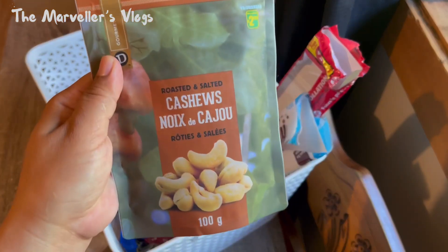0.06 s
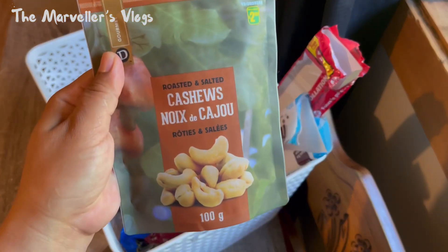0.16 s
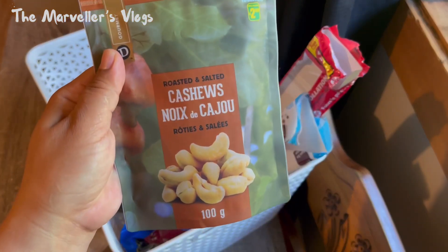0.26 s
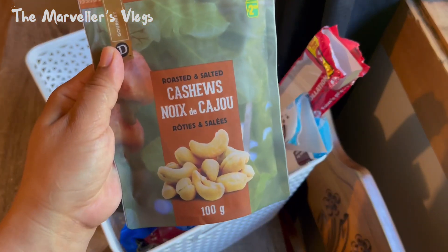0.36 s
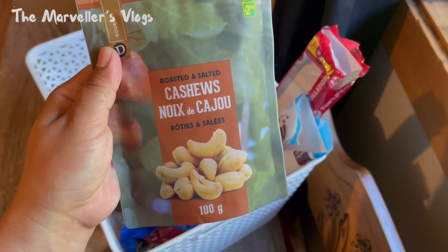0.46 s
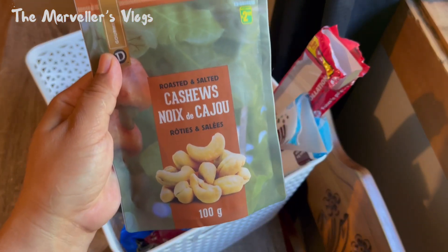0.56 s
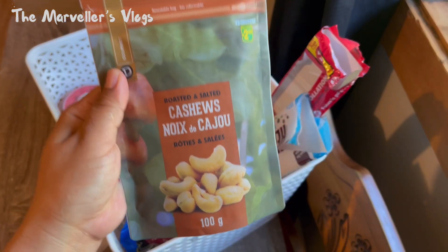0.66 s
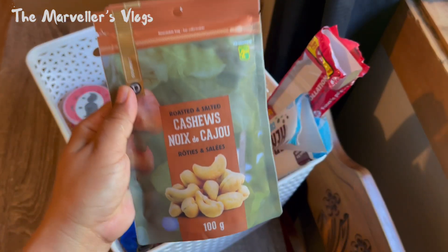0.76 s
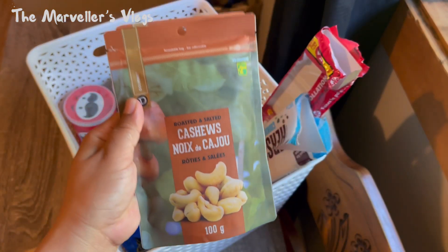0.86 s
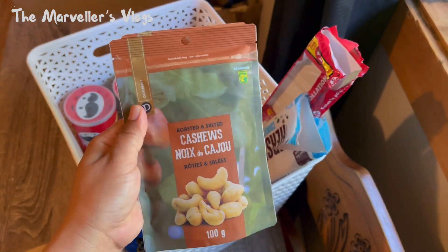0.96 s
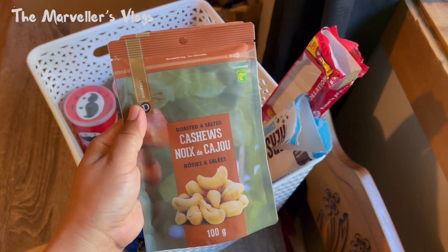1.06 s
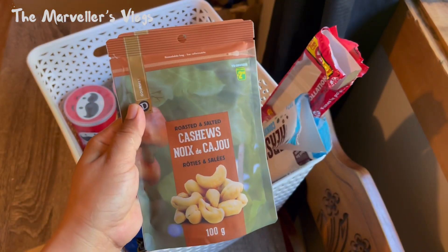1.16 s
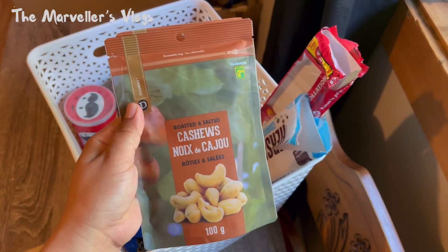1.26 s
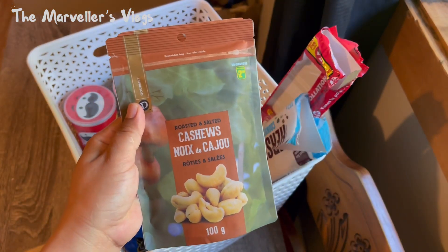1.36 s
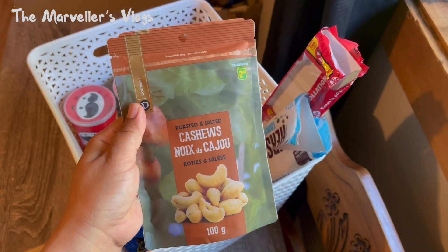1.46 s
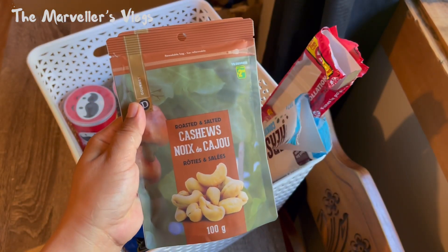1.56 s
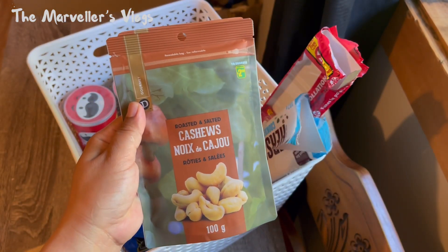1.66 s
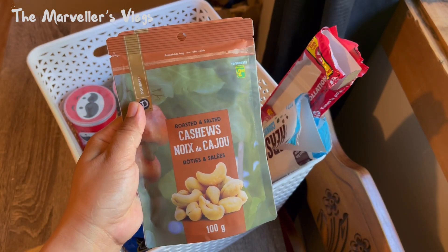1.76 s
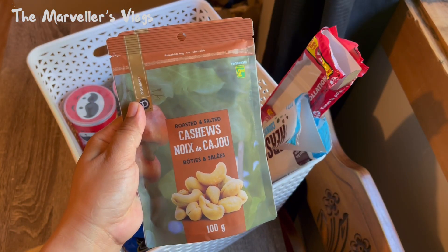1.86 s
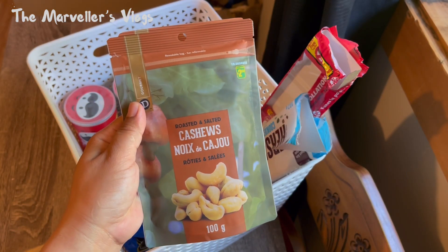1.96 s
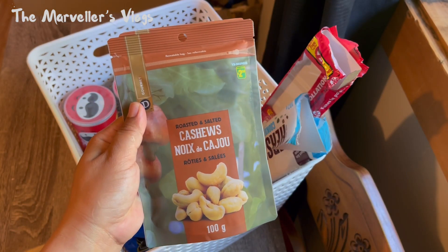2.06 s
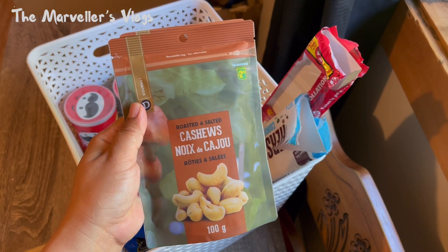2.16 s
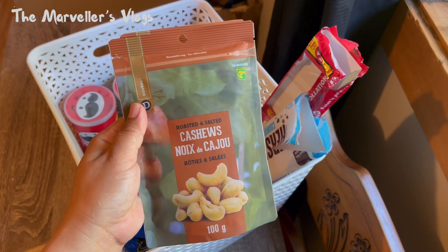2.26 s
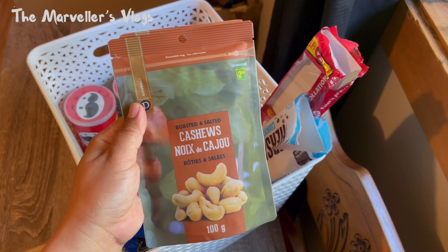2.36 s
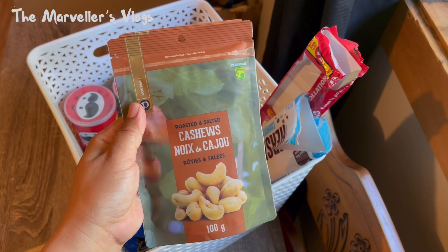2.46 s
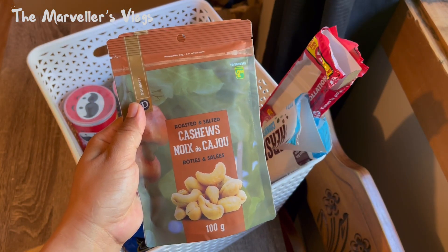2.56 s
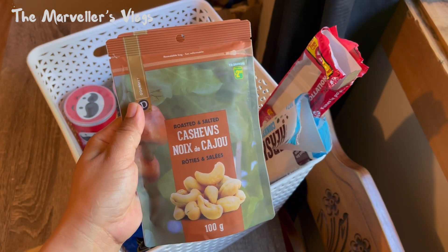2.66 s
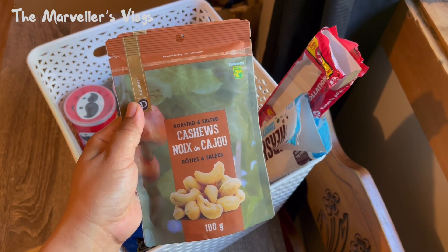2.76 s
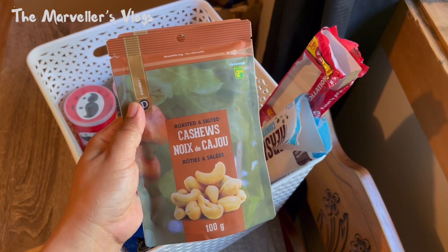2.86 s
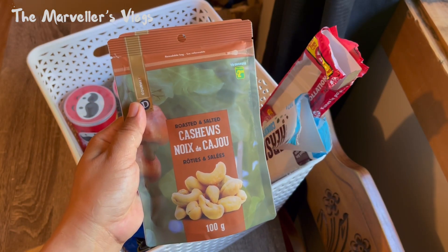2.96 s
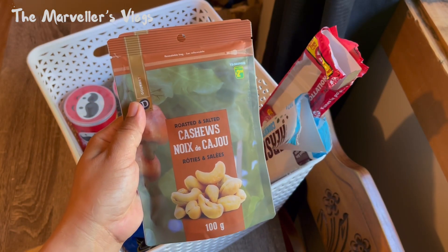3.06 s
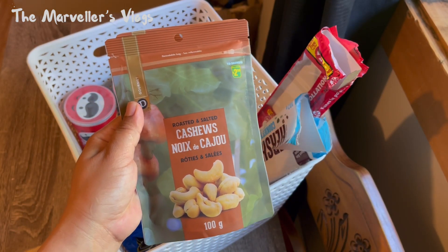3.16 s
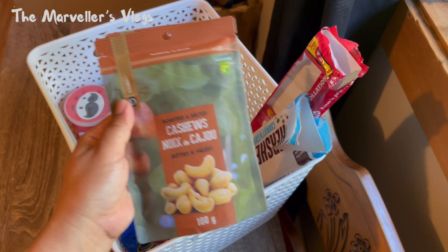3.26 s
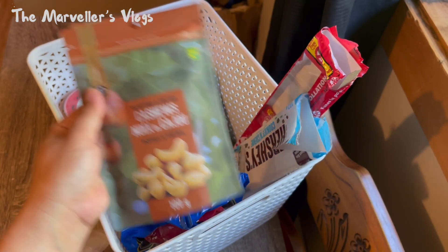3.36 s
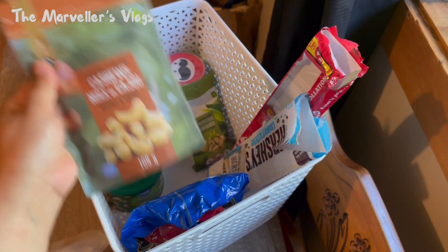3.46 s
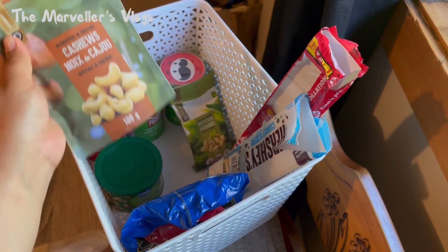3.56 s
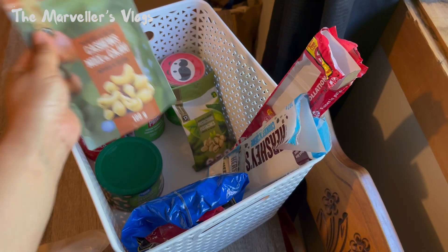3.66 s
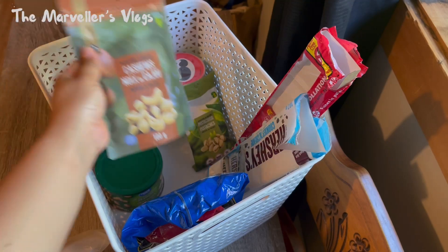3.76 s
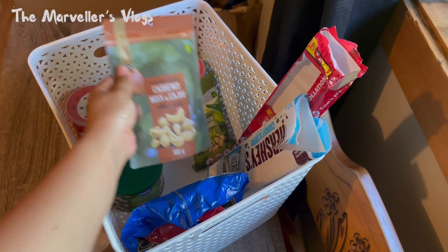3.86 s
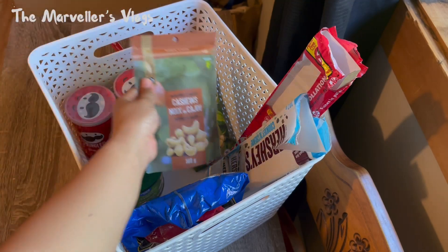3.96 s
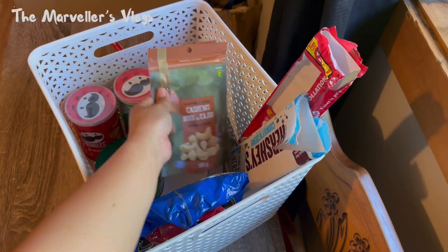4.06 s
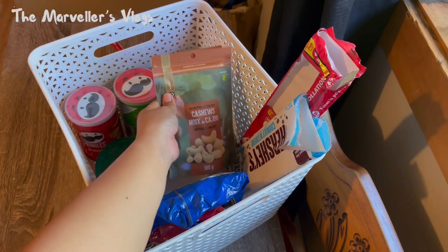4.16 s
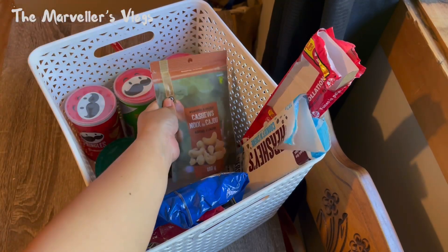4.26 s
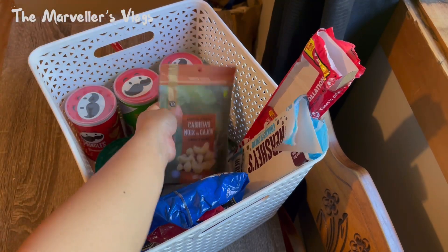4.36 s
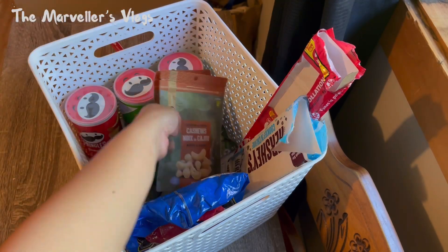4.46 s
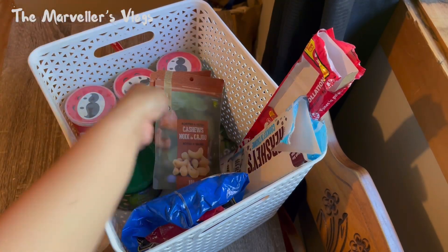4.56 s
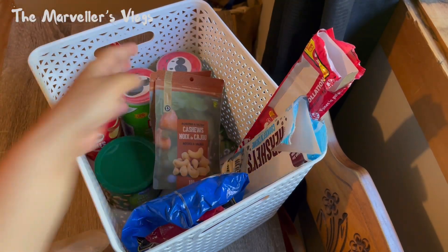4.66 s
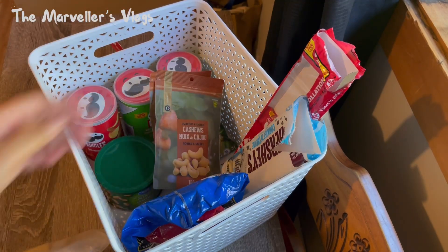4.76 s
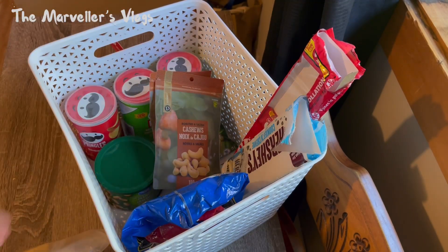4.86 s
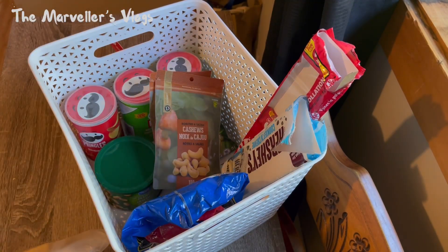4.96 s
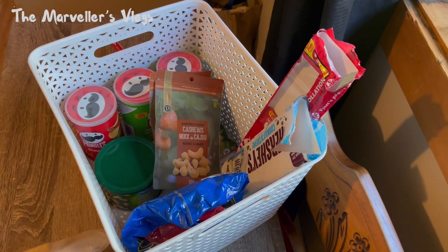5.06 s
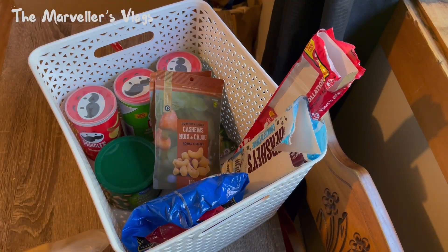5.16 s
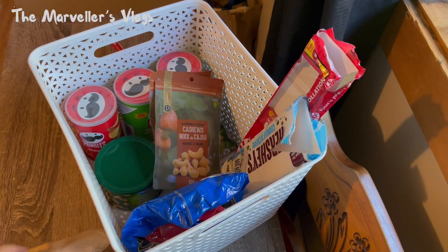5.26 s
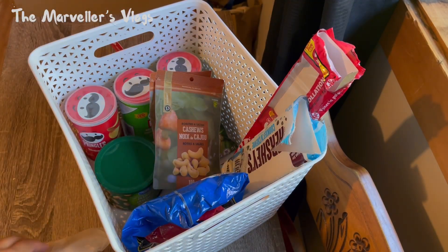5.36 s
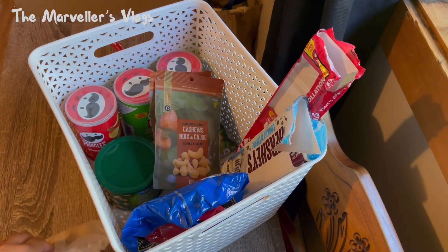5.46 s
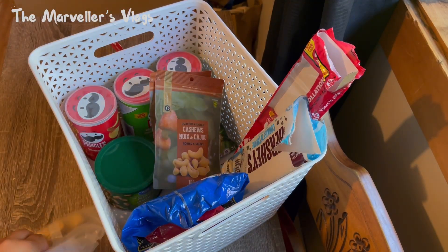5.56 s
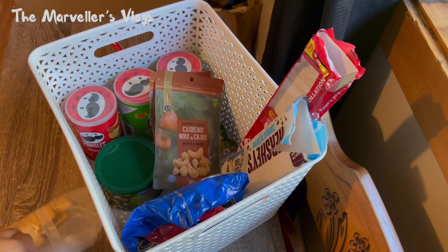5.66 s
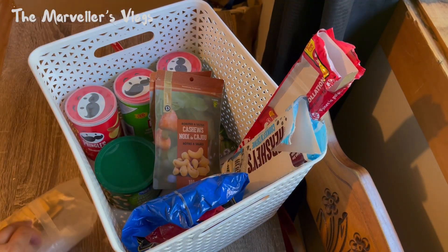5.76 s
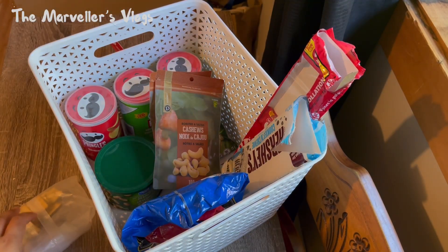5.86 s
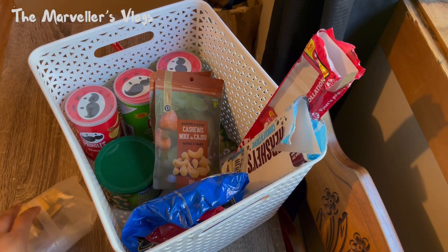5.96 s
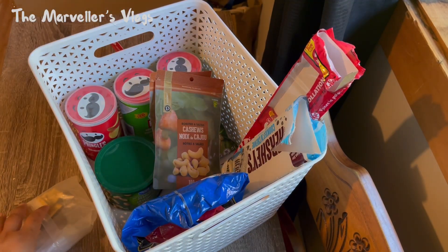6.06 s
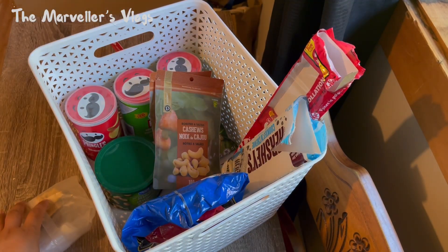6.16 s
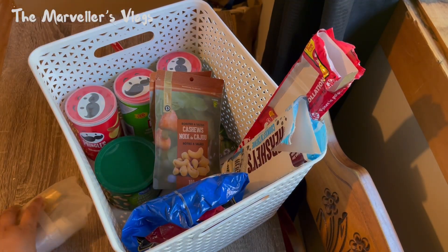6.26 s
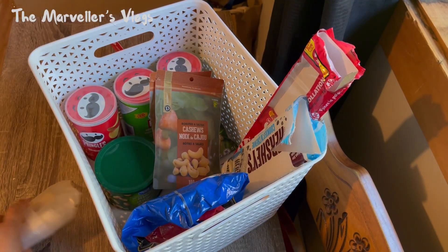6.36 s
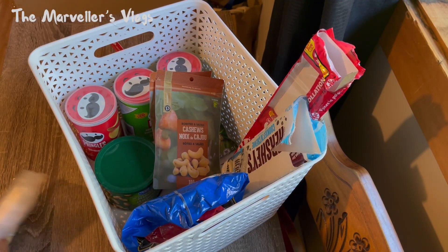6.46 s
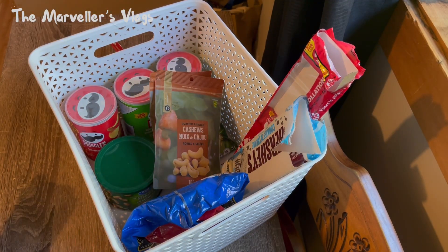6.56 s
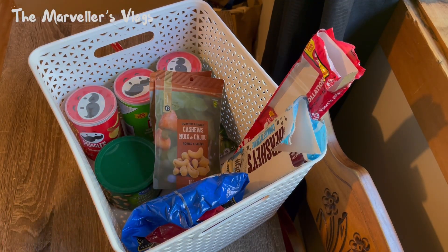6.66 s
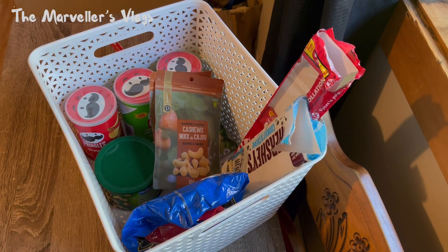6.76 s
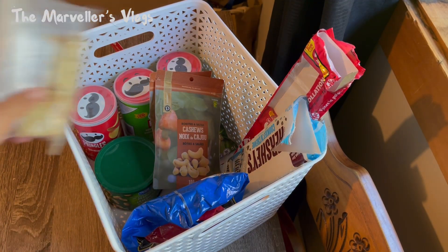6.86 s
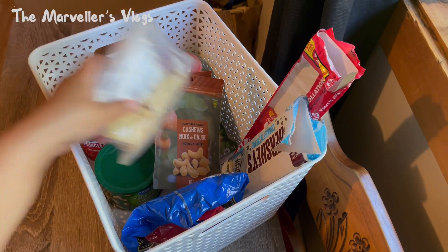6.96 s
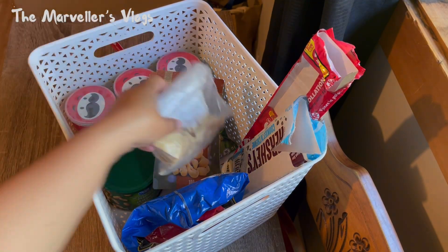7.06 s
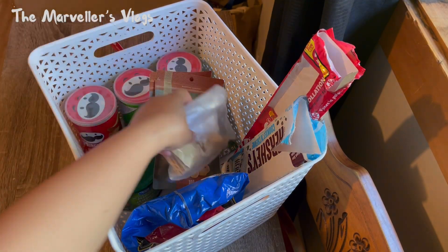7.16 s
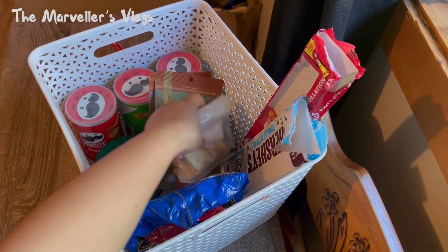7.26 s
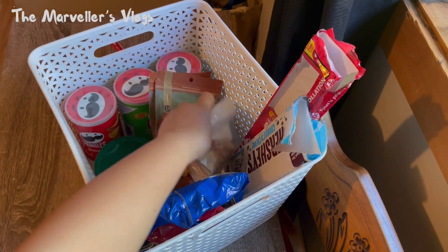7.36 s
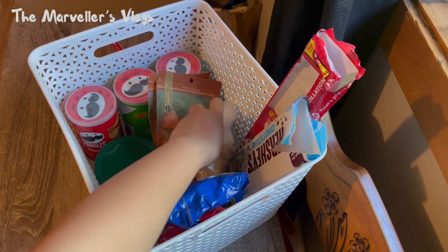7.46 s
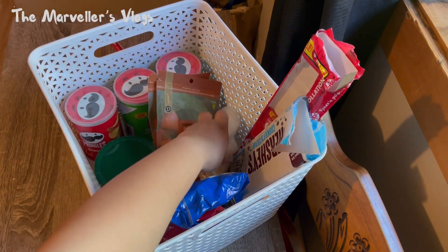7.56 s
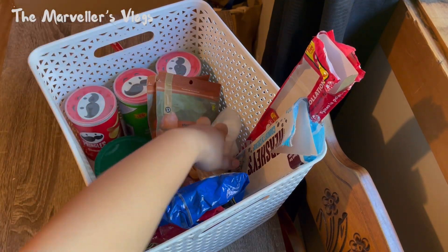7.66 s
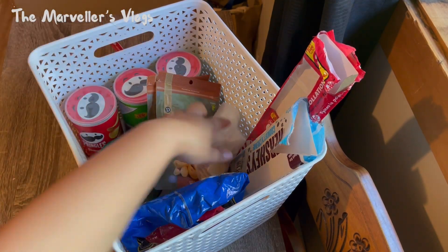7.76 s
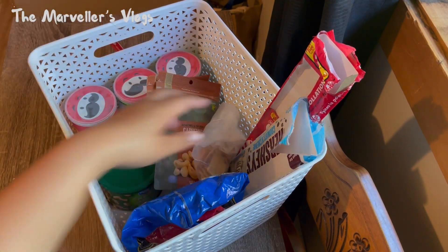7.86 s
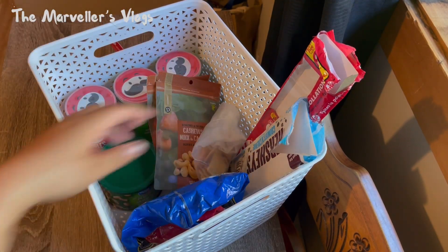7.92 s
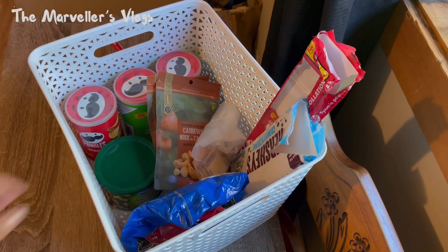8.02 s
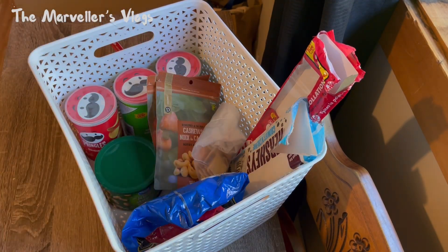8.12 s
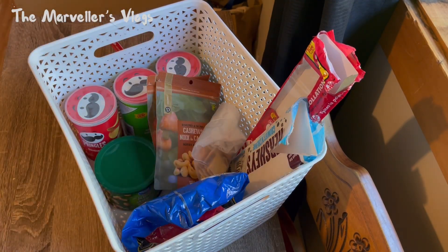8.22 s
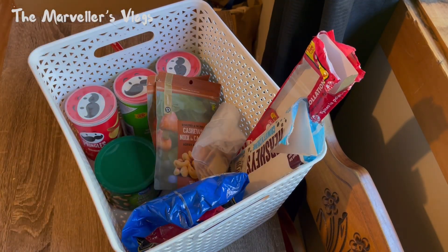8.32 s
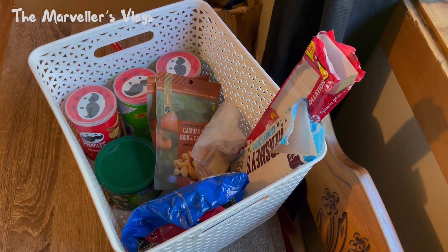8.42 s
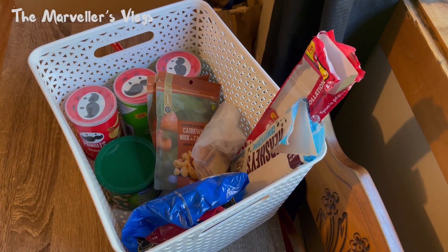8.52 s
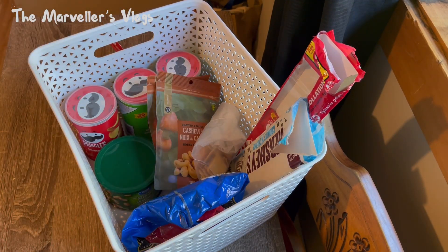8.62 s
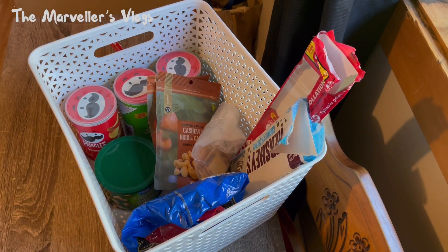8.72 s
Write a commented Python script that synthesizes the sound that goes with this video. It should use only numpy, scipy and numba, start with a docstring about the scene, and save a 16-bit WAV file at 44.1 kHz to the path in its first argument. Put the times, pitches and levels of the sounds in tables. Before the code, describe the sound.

Plastic snack pouches crinkle and crackle close by as they are handled and packed into a basket in a quiet room.

```python
"""Snack pouches of stiff plastic film are packed into a basket, close to a phone in a quiet room.
At first a held pouch gives lone snaps, each a crease buckling, while an appliance hums far off.
Faint chirps come after 2 s. From 3.2 s the pouch is swung over and set down with soft thuds; handling
makes swarms of tiny snaps over a soft rub. From 5.3 s a thin bag is gripped, carried and tucked in.
At 8.4 s the next bag is touched, then picked up."""
import sys
import numpy as np
from scipy import signal
from scipy.fft import rfft, irfft, next_fast_len
from scipy.io import wavfile
from scipy.ndimage import uniform_filter1d
from numba import njit

SR = 44100
rng = np.random.default_rng(int(sys.argv[2]) if len(sys.argv) > 2 else 0)


def to_wav(s):
    """Save 16-bit WAV."""
    ch = np.atleast_2d(s).T  # columns
    pcm = np.round(np.clip(ch, -1, 1) * 32767)  # PCM
    wavfile.write(sys.argv[1], SR, pcm.astype(np.int16))


N = 387638
FFT_SIZE = next_fast_len(N, True)
BINS_HZ = np.fft.rfftfreq(FFT_SIZE, 1 / SR)

# The rustle, one list of rows per hand movement: time_s, level_db, brightness_db
# Movements: swing over, set down, grip, gather, carry, tuck in, touch the next bag, pick it up.
HAND_MOVES = [
    [(3.18, -100, -12), (3.211, -80, -13), (3.3, -82, -7), (3.335, -71.5, -10), (3.37, -83, -12),
     (3.445, -78.5, -12), (3.458, -56.5, 1.5), (3.69, -58.5, -2), (3.947, -53, -2.5), (4.013, -61, -1.5)],
    [(4.057, -49.5, 1), (4.155, -58, 6), (4.27, -43, 2), (4.456, -47, 2), (4.54, -59.5, -3),
     (4.653, -77, -9.5), (4.863, -71.5, -10), (4.985, -80, -8.5), (5.088, -89, -11.5), (5.25, -92.5, 3)],
    [(5.284, -65.5, 10.5), (5.338, -57, -6), (5.366, -45, 1), (5.517, -43, 1.5), (5.577, -40.5, 8),
     (5.719, -51, -2), (5.845, -80, -7.5), (5.917, -82, -8)],
    [(5.939, -72.5, -1), (6.046, -50.5, 1.5), (6.148, -55, 1.5), (6.178, -46.5, 5), (6.232, -48, 1),
     (6.348, -41, 5.5), (6.439, -46, 9.5), (6.549, -59.5, 9), (6.633, -56.5, 8.5), (6.703, -64, 3)],
    [(6.761, -53, 6), (6.824, -58, 6.5), (7.014, -50, 7.5), (7.12, -59, 6)],
    [(7.214, -49, 3), (7.273, -51, 1), (7.327, -39, 2.5), (7.409, -47, 0.5), (7.47, -39, 4),
     (7.57, -37.5, 5), (7.623, -50, 1), (7.683, -45, 7.5), (7.79, -65, -1.5), (7.902, -65, 18),
     (8.04, -71.5, -1.5), (8.215, -81, -7.5), (8.33, -81, -5)],
    [(8.359, -52, 1), (8.527, -61, 2.5)],
    [(8.549, -52.5, -16.5), (8.588, -41, 0), (8.788, -46.5, 2)],
]


def big_snaps():
    """Single creases buckle; a bright one has more treble and dies sooner, a full one has more body."""
    # one snap a row: start_s, level_db, brightness_db, body_db, pitch_hz
    snaps = [(0.0608, -60, -17, -13, 1600), (0.0812, -48.5, -8.5, -12, 1240), (0.288, -56, -41, -4, 1070),
             (0.4145, -43.5, -23.5, -2, 1520), (0.4644, -56.5, -22, 0, 1240),
             (0.5599, -56.5, -11, -11, 1490), (0.802, -29.5, -34, -15.5, 2150),
             (1.3508, -51.5, -27, -28, 1320), (1.6535, -59.5, -37, -17, 2280),
             (1.7447, -45.5, -19, -25, 1720), (1.8381, -40.5, -11.5, -23, 1230),
             (1.9902, -60, -32, -22, 1420), (2.071, -71, -25, -2, 1100), (2.775, -69, -23, -7, 1230),
             (3.1966, -51.5, -22.5, -30, 1720), (3.5072, -38, -11, -19, 1200),
             (3.5489, -32, -14, -11, 1160), (3.5562, -22, -13.5, -11.5, 3500),
             (3.5635, -24.5, -24, -16, 2660), (3.6584, -44, -8, -3, 902), (3.7185, -35.5, -12, -10, 1330),
             (3.7558, -28.5, -23.5, -13.5, 975), (3.8042, -34.5, -14, -14, 1040),
             (3.8768, -39, -12, -6, 931), (4.026, -42, -11, -5, 1800), (4.045, -32, -19, -9.5, 1990),
             (4.0602, -25.5, -6.5, -22, 3460), (4.1185, -34, -3, -34, 2140),
             (4.1736, -28.5, -5.5, -15, 4160), (4.2073, -25, -16.5, -14, 1930), (4.2517, -23, -9, -9, 1410),
             (4.2872, -27.5, -9.5, -4.5, 1560), (4.314, -26, -5.5, -25, 1150), (4.3275, -30, -4, -18, 1440),
             (4.346, -24.5, -15, 1, 1040), (4.3903, -26.5, -10.5, -9, 1820),
             (4.409, -22.5, -17.5, -13, 1190), (4.4674, -15.5, -15.5, -17, 940),
             (4.997, -48.5, -21, -25, 3180), (5.3495, -29.5, -7, -12, 1460),
             (5.3888, -30.5, -3.5, -23, 2950), (5.4084, -26, 0, -17, 1440),
             (5.4179, -22.5, 2.5, -12.5, 5940), (5.4418, -28, -1, -16.5, 1460),
             (5.4599, -25.5, 4.5, -14, 3720), (5.5237, -32, -5, -23, 1470), (5.5581, -25, -3.5, -13, 1470),
             (5.5761, -21, -2, -23, 5570), (5.5833, -17.5, -7, -22, 1240), (5.59, -20.5, -3, -15, 1510),
             (5.6579, -27, -13.5, -23, 1220), (5.9277, -41.5, -10, -5, 1250),
             (6.0276, -30.5, -8.5, -13, 4040), (6.0368, -30, -8, -13, 4100), (6.0668, -29.5, -2, -21, 1160),
             (6.1689, -30, -2, -17, 4730), (6.1732, -28.5, -5.5, -20, 1150), (6.2436, -32, -13, -14, 1490),
             (6.2709, -34.5, -8, -12, 1460), (6.3155, -26.5, -8, -16, 1280),
             (6.3497, -27.5, -5.5, -18, 4600), (6.3613, -30, 3, -23, 1390), (6.4113, -25, -1.5, -16, 1240),
             (6.4325, -27, -4, -12, 5870), (6.4541, -31.5, 1.5, -23, 1440), (6.543, -39, -11, -36, 2340),
             (6.6355, -38, -11, -17, 5990), (6.7433, -31.5, -34, -33, 1380), (6.808, -26.5, 1.5, -49, 5100),
             (6.8383, -29, 0.5, -37, 5550), (6.8768, -34.5, -6, -37, 5080), (6.9044, -34, -10, -20, 2620),
             (6.9346, -28.5, -3, -38, 5730), (6.9665, -31, -5, -16.5, 937), (6.9988, -22.5, -10, -28, 1520),
             (7.0191, -32, 0.5, -21, 5870), (7.066, -29, -16.5, -16, 1330),
             (7.1464, -33.5, -7, -10.5, 2620), (7.192, -30, -8, -15, 2220),
             (7.2045, -27.5, -0.5, -14.5, 2160), (7.2368, -27.5, -17.5, -14, 1290),
             (7.2923, -24.5, -10, -22, 1890), (7.311, -26.5, 0, -27, 1910), (7.3209, -26, -1, -23, 3150),
             (7.3376, -25.5, -2, -24, 2010), (7.3673, -27, -0.5, -27, 1590), (7.4292, -23, -4.5, -22, 3350),
             (7.539, -23, -2.5, -21, 1750), (7.572, -31, 1, -17, 3270), (7.6125, -35.5, -1, -22, 1930),
             (7.651, -30, -7, -13.5, 1930), (7.6636, -28.5, 0, -17, 2320), (7.692, -28, 1, -15, 2200),
             (7.8174, -33, 4, -19, 1740), (7.881, -27.5, -2, -24, 993), (7.9102, -32, 0.5, -19, 3040),
             (7.9646, -45.5, -2, -14, 1770), (8.0686, -46, -28, -10, 1320), (8.1236, -54, -30, -8, 1540),
             (8.2371, -43.5, -10, -24, 2580), (8.3625, -41, -1, -9, 1270), (8.3789, -37, -14, -7.5, 945),
             (8.4201, -41.5, -6, -4, 1270), (8.4452, -30.5, -8, -34, 4870), (8.5692, -24, -6, -5, 970),
             (8.5814, -25.5, -3.5, -1, 1260), (8.6038, -23.5, -4, -4, 1270), (8.6377, -27, 1, -8, 1310),
             (8.654, -22, -12, -24, 2510), (8.6987, -20.5, -4.5, -14, 2030),
             (8.7185, -22.5, -12, -34, 1560), (8.737, -31, -5, -9, 1120)]
    start_s, level_db, bright_db, body_db, pitch_hz = np.transpose(snaps)
    upper_ranges_db = np.outer(bright_db, [1.3, 0.047, -0.12]) + [7.5, -9, -10.5]  # top, upper, middle
    colour_db = np.column_stack([upper_ranges_db, body_db - 0.5])
    ring_s = .017 * np.exp(-0.027 * bright_db)
    return creases(start_s, level_db[:, None] + colour_db - 11.5, pitch_hz, ring_s, tone_count=130)


def crinkle():
    """Many small creases buckle at random moments; gentle handling rubs the film more than it buckles it."""
    creases_per_s, low_hz, high_hz = 340, 940, 5470
    first_s = HAND_MOVES[0][0][0]
    span_s = N / SR - first_s
    when, size, ring, pitch = rng.random((int(creases_per_s * span_s), 4)).T
    start_s = first_s + when * span_s
    hand_db = rustle_levels()[:, (start_s * SR).astype(int)]
    gentle_db = .5 * np.minimum(hand_db[1] + 56, 0)
    size_db = 3 * np.minimum(-np.log(size), 3.5)  # many small, a few large
    ranges_db = (hand_db + gentle_db + size_db - 6.5).T
    pitch_hz = low_hz * (high_hz / low_hz) ** pitch
    return creases(start_s, ranges_db, pitch_hz, ring_s=.011 * (.5 + ring), tone_count=16)


def creases(start_s, ranges_db, pitch_hz, ring_s, tone_count):
    """Each buckling crease makes the film ring with its own set of tones, starting one after another."""
    # the four pitch ranges (top, upper, middle, body): centre_hz
    centres_hz = [10400, 4320, 1420, 460]
    place, late, size, phase_a, phase_b = rng.random((len(start_s), tone_count, 5)).T
    hz = 330 + 15700 * ((np.arange(tone_count)[:, None] + place) / tone_count) ** 2
    db = np.array([np.interp(np.log(tones_hz), np.log(centres_hz[::-1]), levels_db[::-1])
                   for tones_hz, levels_db in zip(hz.T, ranges_db)]).T
    db += 11.25 * (size - .5) - 0.01 * np.log2(hz / 4000)
    octaves_away = np.log2(hz / pitch_hz)
    db += 6 * (np.exp(-(octaves_away / 0.36) ** 2) - .4)  # louder near the crease's own pitch
    ring_s = np.clip(ring_s, .004, .08)
    tone_ring_s = ring_s * (hz / 4000) ** -.3  # low tones ring longer
    step = np.exp(2j * np.pi * hz / SR - np.log(1000) / (tone_ring_s * SR))
    delay_s = .0021 * late ** 3 * ring_s / .015
    start = ((start_s + delay_s) * SR).astype(int)
    stop = np.minimum(N, start - np.log(100) / np.log(abs(step))).astype(int)  # 40 dB down
    strength = gain(db) * np.exp(2j * np.pi * np.array([phase_a, phase_b]))
    return ringing_tones(N, start.ravel(), stop.ravel(), step.ravel(), strength.reshape(2, -1))


@njit
def ringing_tones(size, start, stop, step, strength):
    """Add up dying tones in two channels; each step turns a tone's phase and shrinks it a little."""
    out = np.zeros((2, size))
    for k in range(len(start)):
        a, b, turn = strength[0, k], strength[1, k], step[k]
        for i in range(start[k], stop[k]):
            out[0, i] += a.imag
            out[1, i] += b.imag
            a, b = a * turn, b * turn
    return out


def rustle_levels():
    """How strongly the hand stirs the top, upper, middle and body ranges, in dB at every sample."""
    # extra crunch in the middle range, one per movement: level_db
    crunch_db = [0.1, 0.6, -0.6, -0.2, 0.7, 2, -0.5, 0]
    # a full, heavy pouch rustles with more body, one per movement: level_db
    body_db = [1, 3, -1.5, -0.5, 0.5, -1.5, 4, 5]
    moves = zip(HAND_MOVES, crunch_db, body_db)
    rows = [(*row, crunch, body) for move, crunch, body in moves for row in move]
    level_db, bright_db, *bag_db = over_time(rows)
    bright_share, offset_db = [0.87, 0.22, -0.44, -0.56], [[0.44], [-2.5], [1.5], [-1]]
    ranges_db = level_db + np.outer(bright_share, bright_db) + offset_db
    ranges_db[-2:] += bag_db
    return ranges_db


def film_rub():
    """Film slides on film and skin: bands of hiss that flicker together and alone."""
    # bands of hiss: low_hz, high_hz, level_db, range_index (rounded; 0 top to 3 body, -3 means 1)
    bands = [(224, 550, -3, 3), (427, 860, -2, 3), (927, 1526, -2.5, 2), (1580, 2790, -2, 2),
             (2415, 4030, -6.5, 0), (4310, 6950, 3, 1), (6130, 8420, -1, -3), (9860, 12360, 0.7, -0.5)]
    hand_gain, together_db = gain(rustle_levels() - 4), 2.0 * wander(30)
    out, noise = np.zeros((2, N)), rng.standard_normal((2, N))
    for low_hz, high_hz, db, range_index in bands:
        band = signal.butter(2, (low_hz, high_hz), "bandpass", fs=SR, output="sos")
        level = hand_gain[int(round(range_index))] * gain(db + together_db + 1.8 * wander(40))
        out += signal.sosfilt(band, level * noise) * np.sqrt(SR / 2 / (high_hz - low_hz))
    return out


def basket_thuds():
    """A pouch full of nuts pushes softly on the basket, whose low tones ring briefly."""
    # soft landings: start_s, level_db
    landings = [(3.554, -44), (3.757, -41.5), (4.262, -41), (4.349, -30), (4.426, -44), (4.461, -47),
                (5.57, -41.5), (8.374, -38.5), (8.56, -37.5), (8.6, -43)]
    # the basket's tones: pitch_hz, level_db, ring_s
    tones = [(125.2, -6, 0.17), (257, -7.5, 0.052), (465, -7.5, 0.032)]
    t, rise_s = np.arange(8192) / SR, 0.0063
    pushes = np.zeros(N)
    for start_s, db in landings:
        pushes[int(start_s * SR)] = gain(db)
    ring = sum(gain(db) * fade(ring_s, len(t)) * np.sin(2 * np.pi * hz * t) for hz, db, ring_s in tones)
    return signal.fftconvolve(pushes, ring * np.minimum(t / rise_s, 1))[:N]


def room_echo(sound):
    """A short tail of reflections, strongest in the middle pitches, swells as the nearest walls answer."""
    ring_s, rise_s, echo_db = 0.27, 0.0038, -14
    size = int(ring_s * SR)
    band = signal.butter(1, (700, 4500), "bandpass", fs=SR, output="sos")
    tail = signal.sosfilt(band, rng.standard_normal((2, size))) * fade(ring_s, size)
    tail *= np.clip(np.arange(size) / (rise_s * SR), 0, 1)
    tail *= gain(echo_db) / np.sqrt(np.sum(tail ** 2, axis=1, keepdims=True))
    return signal.fftconvolve(sound, tail, axes=1)[:, :N]


def appliance_hum():
    """A far motor hums; its lowest tone swells and fades, the others waver a little."""
    # the motor's tones: pitch_hz, level_db (the lowest takes its level from swell)
    tones = [(58.57, -61), (118.4, -71.5), (586.8, -92), (877.5, -92.5)]
    # the lowest tone: time_s, level_db
    swell = [(0.0, -61.5), (0.05, -62), (0.49, -67), (1.66, -59.5), (2.03, -71), (2.08, -60), (2.55, -66),
             (2.74, -80), (2.94, -61), (3.7, -60), (4.97, -63.5), (6.22, -58.5), (7.34, -65.5), (7.42, -59),
             (8.01, -62.5), (8.37, -58), (8.52, -63), (8.79, -58)]
    # waver of each higher tone: depth_db
    wavers = [2.5, 3, 2]
    t = np.arange(N) / SR
    levels_db = [over_time(swell)[0]]
    levels_db += [db + depth_db * wander(9) for (_, db), depth_db in zip(tones[1:], wavers)]
    return sum(np.sqrt(2) * gain(db) * np.sin(2 * np.pi * hz * t + 0.24 * wander(2.6))
               for (hz, _), db in zip(tones, levels_db))


def room_tone():
    """The quiet room's steady hush, with a low rumble that swells and fades."""
    # colour of the hush: pitch_hz, level_db
    colour = [(15, -27.5), (25, -8.5), (71, -8), (130, -9.5), (169, -13), (520, -25.5), (593, -25.5),
              (750, -34.5), (878, -31.5), (1080, -38), (6940, -45.5), (8550, -43.5), (10000, -45.5),
              (11400, -40), (13000, -64)]
    # swell of the rumble: time_s, level_db
    swell = [(0, 0.5), (1.0, 2.5), (1.6, -2), (2.6, -4), (3.3, 1.5), (8.79, 3.5)]
    bump_db = 4.5 * np.exp(-((BINS_HZ - 2600) / 350) ** 2)
    shape = gain(over_pitch(colour, BINS_HZ) + bump_db)
    shape /= np.sqrt(np.sum(shape[BINS_HZ > 250] ** 2) / len(shape))  # strength 1 above 250 Hz
    spectrum = rfft(rng.standard_normal((2, FFT_SIZE))) * shape
    low = (BINS_HZ > 110) & (BINS_HZ < 520)
    hush = to_sound(spectrum * ~low)
    rumble = gain(over_time(swell)) * to_sound(spectrum * low)
    return gain(-77.5 + 0.4 * wander(0.85)) * (hush + rumble)


def far_chirps():
    """Thin wavering whistles slide down, blurred by distance."""
    # one chirp a row: start_s, pitch_hz, level_db
    chirps = [(2.14, 2850, -89), (2.335, 2700, -89), (2.62, 2450, -91), (2.87, 2750, -91),
              (5.045, 2820, -82)]
    out, t, length_s = np.zeros(N), np.arange(8192) / SR, .11
    blur, waver = gain(4.5 * wander(90)), .022 * wander(280)
    progress = np.clip(t / length_s, 0, 1)
    for start_s, pitch_hz, db in chirps:
        span = slice(int(start_s * SR), int(start_s * SR) + len(t))
        hz = pitch_hz * (1 - 0.061 * progress + waver[span])
        out[span] += gain(db) * np.sin(np.pi * progress) * np.sin(2 * np.pi * np.cumsum(hz) / SR)
    return blur * out


def microphone_ports(pair):
    """Two unrelated channels become what the phone's two microphone openings share and hear apart."""
    # how alike the two sides are: pitch_hz, likeness (0 to 1)
    likeness = [(100, 0.89), (350, 0.83), (800, 0.42), (7000, 0.5), (8200, 0.98), (15000, 0.88)]
    # how far the left side is ahead: pitch_hz, lead_radians
    left_lead = [(300, 0.28), (2000, 0.27), (3000, 0.78), (6500, 1.05), (7600, 1.1), (8600, -0.26)]
    # how much louder the left side is: pitch_hz, level_db
    left_boost = [(300, 2), (520, 3.5), (6000, 4), (8300, 1.3), (15000, -1.5)]
    treble_lag_s = 0.00027  # the left side lags above the last row of left_lead
    treble_hz = np.maximum(BINS_HZ - left_lead[-1][0], 0)
    lead = over_pitch(left_lead, BINS_HZ) - 2 * np.pi * treble_lag_s * treble_hz
    alike = np.clip(over_pitch(likeness, BINS_HZ), 0, 1)
    shared, apart = rfft(pair, FFT_SIZE)
    side = np.array([[1], [-1]])
    both = np.sqrt((1 + alike) / 2) * shared + side * np.sqrt((1 - alike) / 2) * apart
    balance = gain(side * over_pitch(left_boost, BINS_HZ) / 2)
    return to_sound(both * balance * np.exp(.5j * side * lead))


def gain(db):
    """Turn decibels into a multiplier."""
    return 10 ** (np.asarray(db) / 20)


def to_sound(spectrum):
    """Turn a two-channel spectrum into N samples."""
    return irfft(spectrum, FFT_SIZE)[:, :N]


def over_pitch(table, hz):
    """Read (pitch_hz, value) rows on a logarithmic pitch scale."""
    rows = np.array(table)
    return np.interp(np.log(hz + 1), np.log(rows[:, 0] + 1), rows[:, 1])


def over_time(rows):
    """Read (time_s, value, ...) rows at every sample."""
    time_s, *columns = np.transpose(rows)
    return np.array([np.interp(np.arange(N) / SR, time_s, column) for column in columns])


def wander(changes_per_s):
    """A smooth random curve whose typical size is 1."""
    hold = int(SR / changes_per_s)
    steps = np.repeat(rng.standard_normal(N // hold + 1), hold)
    curve = uniform_filter1d(uniform_filter1d(steps, hold), hold)[:N]
    return curve / np.sqrt(np.mean(curve ** 2))


def fade(ring_s, size):
    """Die away by 60 dB in ring_s seconds."""
    return np.exp(-np.log(1000) * np.arange(size) / (ring_s * SR))


def scene():
    """Pouches, basket and chirps echo in the room, over its hush and the hum."""
    sounds = big_snaps() + crinkle() + film_rub() + basket_thuds() * [[1], [.3]] + far_chirps()
    heard = microphone_ports(sounds + room_echo(sounds) + room_tone())
    return heard + appliance_hum() * gain([[.45], [-.45]])


def record(dry):
    """The microphone weakens the deepest bass and the high treble; the very top is cut off."""
    # the microphone's response: pitch_hz, level_db
    response = [(25, -19.5), (48, 2), (11200, 0.63), (12000, -12.5), (12800, -14.5), (13800, -44),
                (15200, -30.5), (16500, -30.5)]
    coloured = to_sound(rfft(dry, FFT_SIZE) * gain(over_pitch(response, BINS_HZ)))
    top_hz = 16900
    return signal.sosfilt(signal.ellip(8, .2, 70, top_hz, fs=SR, output="sos"), coloured)


dry = scene()
out = record(dry)
to_wav(out)
```